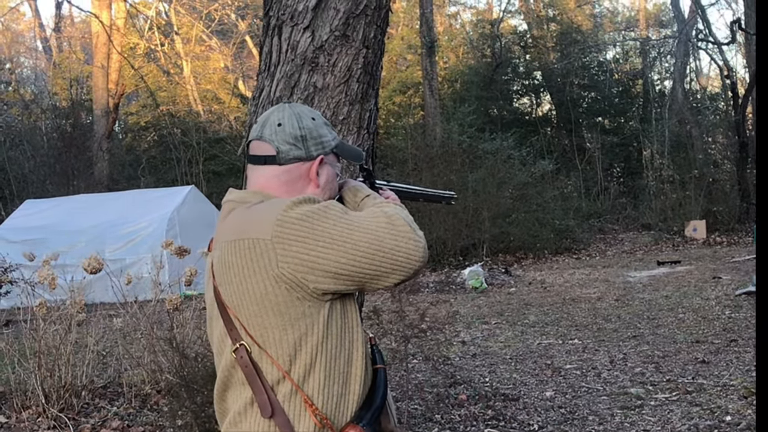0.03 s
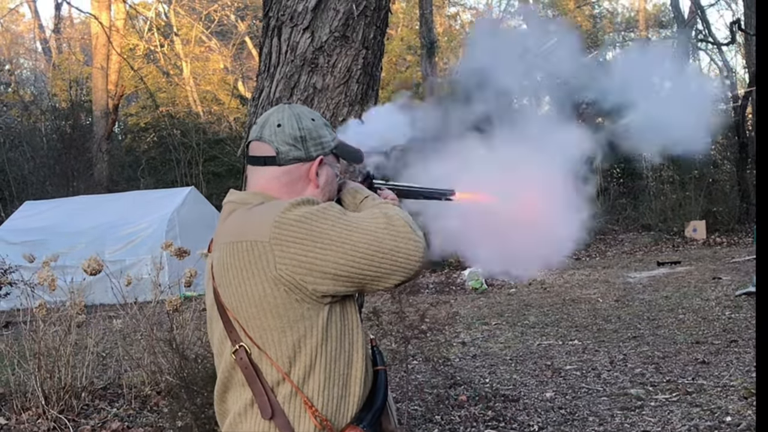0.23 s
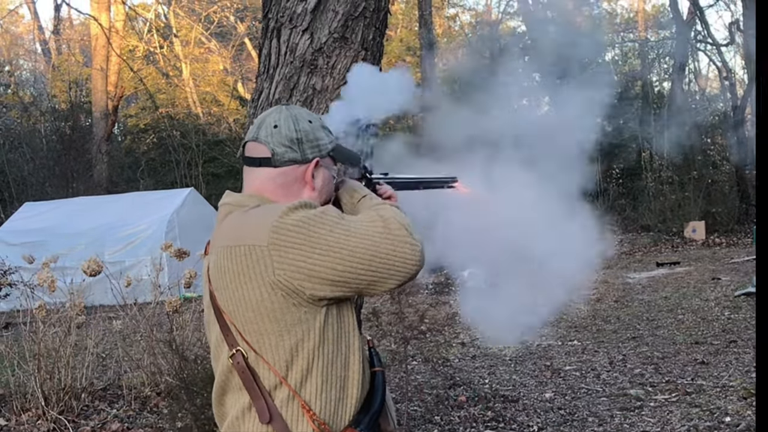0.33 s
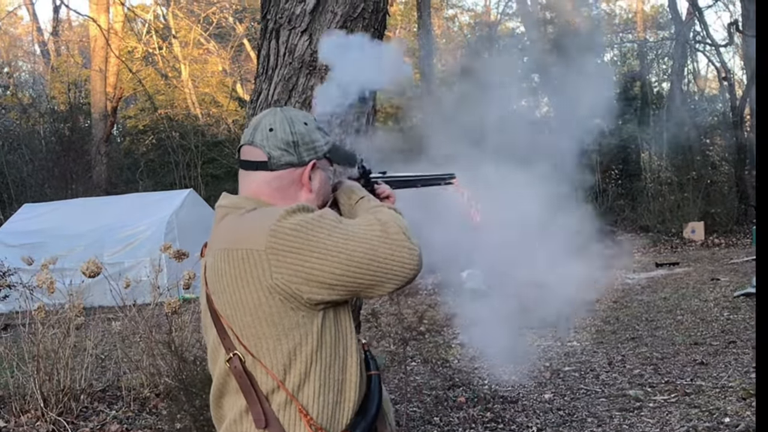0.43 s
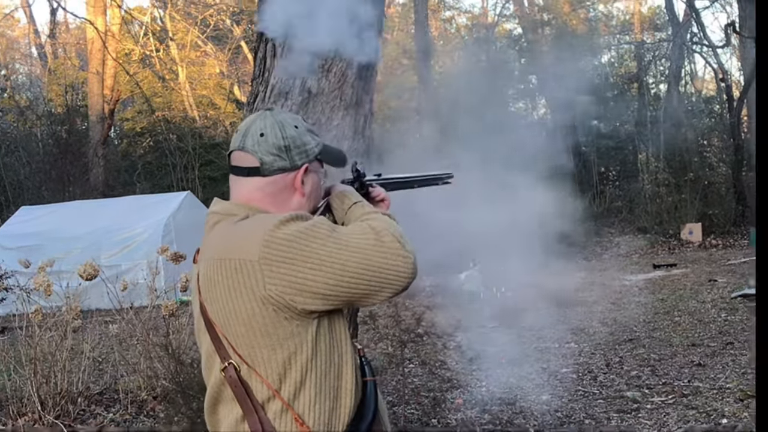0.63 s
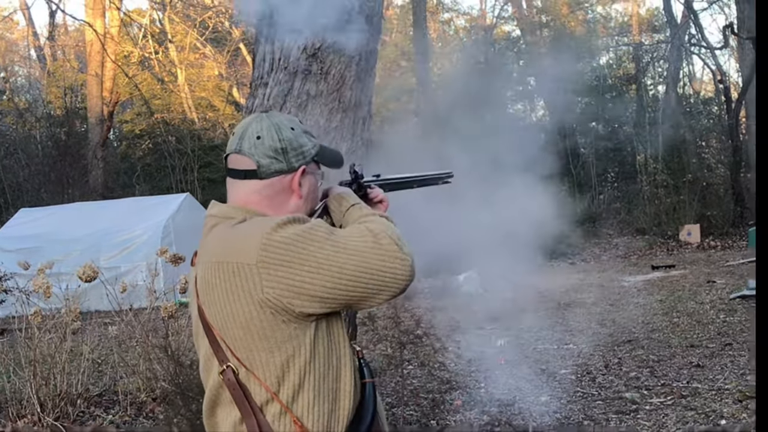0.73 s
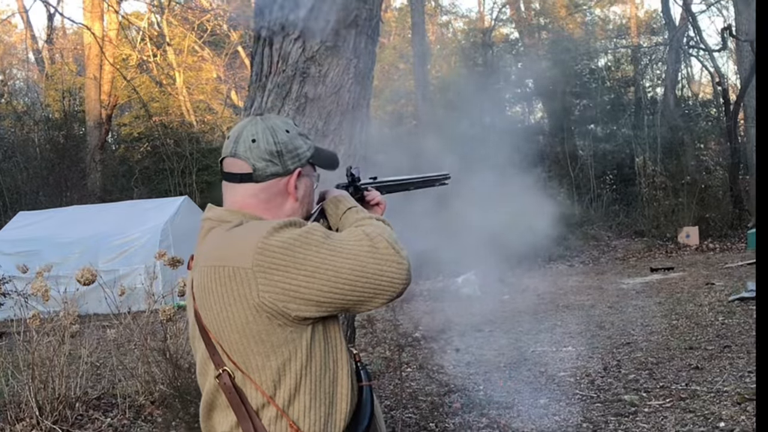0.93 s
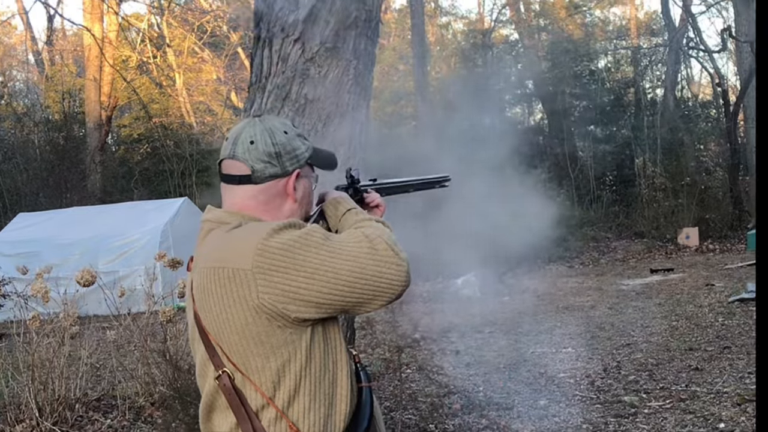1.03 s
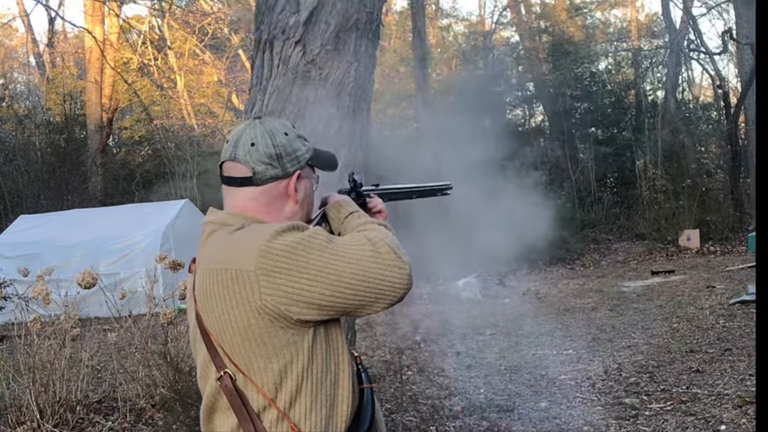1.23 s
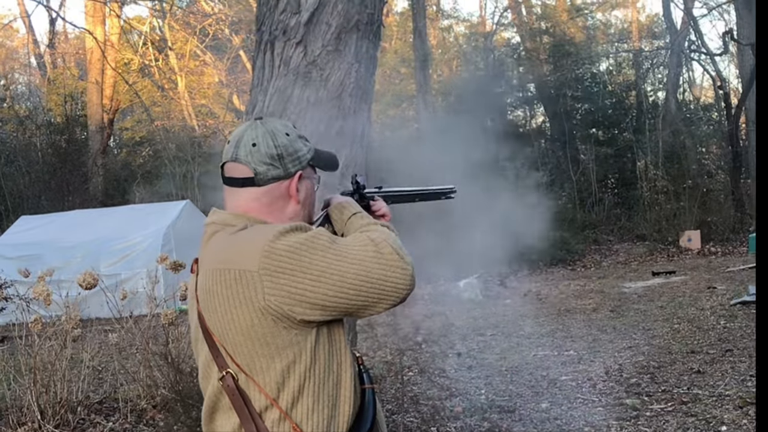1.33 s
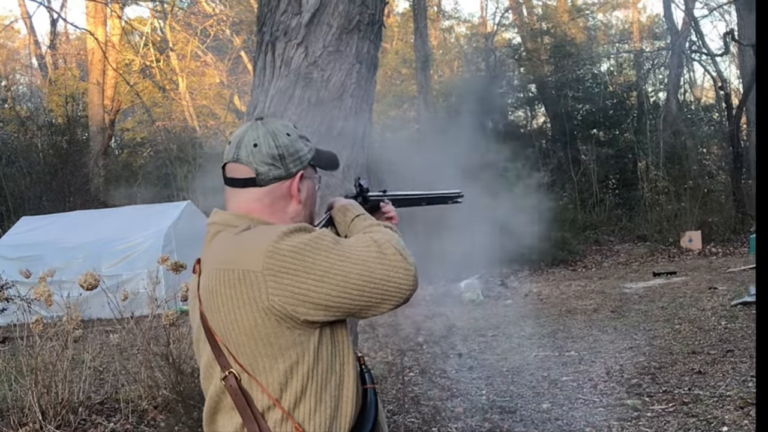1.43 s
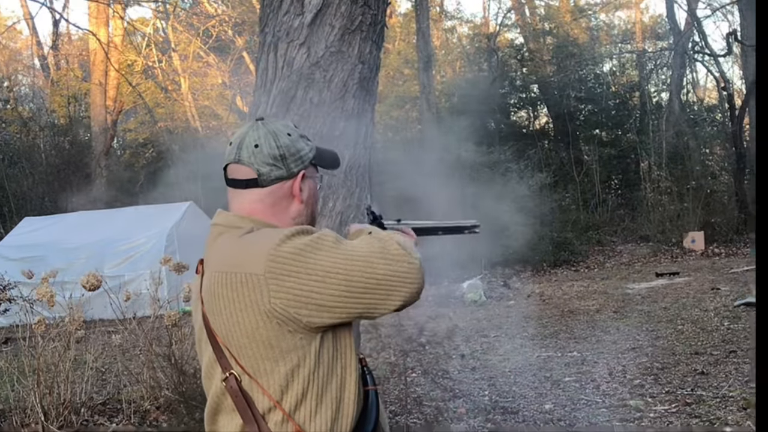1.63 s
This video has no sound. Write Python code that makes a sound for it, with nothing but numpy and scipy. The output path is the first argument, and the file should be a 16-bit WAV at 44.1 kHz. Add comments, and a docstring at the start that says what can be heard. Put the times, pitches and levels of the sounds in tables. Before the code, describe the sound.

A flintlock rifle fires one shot a few metres away in a clearing. The flint snaps at 0.1 seconds, powder fizzes briefly, and at 0.2 seconds comes a loud crack with a deep, thumping roar. Nearby trunks slap it back until 0.4 seconds, then a dulling echo rolls through the woods, fading by about 1.7 seconds. A faint low rumble lies underneath, with tiny ticks of gear around 1.5 seconds.

```python
"""First comes the snap of flint on steel and a fizz of powder, then a flintlock rifle fires in a clearing,
a few metres away. The charge goes off with a crack, a roar of gas and deep pressure waves.
Near trunks slap the sound back, then the woods roll it away, ever duller as the air soaks up the treble.
Underneath lie a low rumble and faint ticks of gear and leaf litter."""
import sys
import numpy as np
from scipy import signal
from scipy.fft import rfft, irfft
from scipy.io import wavfile

SR = 44100
rng = np.random.default_rng(int(sys.argv[2]) if len(sys.argv) > 2 else 0)


def unload_wav(signal):
    """Save mono or channel-first audio to the path in sys.argv[1] as 16-bit WAV at rate SR, clipped to [-1, 1]."""
    wavfile.write(
        sys.argv[1],
        SR,
        np.round(np.clip(np.atleast_2d(signal).T, -1, 1) * 32767).astype(np.int16),
    )


N = 74970
T = np.arange(N) / SR
HZ = np.maximum(np.arange(N + 1) * SR / (2 * N), 1)
SHOT_S, ROAR_S = .2068, .214  # when the crack and the roar start

# The tone colour of each noise. Each row: frequency in Hz, relative level in dB.
CRACK_COLOUR = [(40, -19.5), (120, -3.5), (300, 1.5), (800, -2.5), (2200, -9.5), (3200, -8), (8000, -6.5),
                (11000, -11), (15500, -11)]
ROAR_COLOUR = [(25, -19), (55, -5.5), (110, -5), (200, 4.5), (330, -1.5), (500, -10), (1100, -4.5),
               (1700, -4.5), (3000, -8.5), (5000, -15), (8500, -15), (11000, -19.5), (15500, -20)]
CLICK_COLOUR = [(150, -27), (400, -17.5), (620, -7), (1300, 4.5), (3400, 1), (4700, -5), (6200, 7.5),
                (7600, -6.5), (9000, 6.5), (10700, -12.5), (12700, -0.5), (15500, -4.5)]
RATTLE_COLOUR = [(150, -13.5), (500, -3), (1100, -2), (2200, 4.5), (4300, -6.5), (9000, -4), (10700, -6),
                 (12700, 1), (15500, -2.5)]
SPIT_COLOUR = [(60, 2), (220, 6), (600, 2), (3000, 0), (7000, -3), (15000, -4)]
SLAP_COLOUR = [(100, -16.5), (500, -10), (1300, 6.5), (3300, -7), (5000, -4.5), (6800, 2), (8500, -8),
               (15000, -5.5)]
NEAR_COLOUR = [(30, -23.5), (70, -5.5), (130, -2), (220, -8.5), (330, -2), (460, -8), (700, -5), (1200, 2),
               (1800, -1.5), (3000, -8.5), (6000, -11.5), (10000, -16), (15500, -15)]
FAR_COLOUR = [(40, -24), (90, -5.5), (170, -5.5), (380, -11.5), (700, -3.5), (1100, 0.5), (1600, -1),
              (2200, -8.5), (3200, -13), (5000, -21.5), (9000, -21.5)]
RUMBLE_COLOUR = [(20, -28.5), (50, -7.5), (88, -1.5), (125, -6.5), (220, -11), (380, -30), (600, -24.5),
                 (1000, -35), (2500, -42.5), (6000, -52), (15000, -62)]
RUSTLE_COLOUR = [(1000, -28), (5000, 0), (15000, -10)]
# Pressure waves and their reflections. Each row: peak time in seconds, pitch then in Hz, level in dB,
# spread around the peak in seconds.
THUMPS = [(.2230, 295, -9, .0045), (.2412, 120, -7.5, .0052), (.2500, 65, -18, .012),
          (.2645, 240, -12, .0035), (.2703, 130, -8.5, .005), (.2840, 65, -20.5, .010),
          (.3290, 135, -8, .0036)]
# Blows in the lock (the firing mechanism): its catch, flint on steel, rebounds. Each row: start in
# seconds, level in dB, seconds to fade by 60 dB, frequency in Hz where it rings most.
LOCK_BLOWS = [(.0950, -33, .11, 2000), (0.1008, -15.5, 0.023, 4000), (0.102, -24.5, 0.053, 3000),
              (0.1056, -26, 0.027, 2800), (0.1095, -25.5, 0.037, 850), (0.1135, -24, 0.011, 1400),
              (0.133, -30.5, 0.0093, 2200), (.146, -35, .04, 12000)]
# Tones of the stock, lock and barrel. Each row: pitch in Hz, relative level in dB, an unused value.
RIFLE_TONES = [(790, -2, .025), (1428, -1, .045), (1740, -15, .06), (2150, -6, .055), (2790, -18, .08),
               (3000, -6, .04), (3410, -13, .08), (3960, -16, .1), (5836, -13, .05), (9080, -13, .08),
               (12280, -13, .13), (12860, -13, .13), (14580, -6, .12)]
# Spits of powder. Each row: start in seconds, level in dB, seconds to fade by 60 dB.
SPITS = [(0.1867, -24, .025), (0.1939, -31.5, .05), (0.197, -27.5, 0.075), (0.1978, -30.5, .05)]
# Echoes from near trunks. Each row: start in seconds, level in dB, seconds to fade by 60 dB,
# frequency in Hz above which it is dulled.
SLAPS = [(.2175, -26, 0.0029, 3000), (0.2196, -9, 0.0081, 2568), (.2285, -32, 0.03, 12000),
         (0.256, -16.5, 0.064, 6034), (.2990, -19.5, 0.054, 7000), (0.3175, -14, 0.063, 4630),
         (0.335, -18, 0.0077, 1500), (0.3524, -24, 0.11, 7000), (0.3562, -2.5, 0.0034, 11900),
         (0.3575, -22, 0.056, 7250), (0.3633, -12.5, 0.011, 5500), (0.3768, -17.5, 0.018, 3500)]
# Echo from the clearing's edge and the deep woods. Each row: time in seconds, level in dB before dulling.
NEAR_WOODS = [(.25, -26.5), (.38, -26), (.435, -29.5), (.47, -23.5), (.505, -28.5), (.545, -24), (.61, -29),
              (.68, -34), (.85, -39.5), (1.1, -50.5)]
FAR_WOODS = [(.5, -55), (.72, -36), (.85, -37), (1.0, -34), (1.18, -32.5), (1.3, -34.5), (1.45, -37),
             (1.7, -38)]
# The rumble dips after the shot and comes back. Each row: time in seconds, level change in dB.
RUMBLE_DIP = [(.18, 9), (.3, 2), (0.949, -6), (1.299, 1.5)]
# Ticks of gear and leaf litter. Each row: start in seconds, level in dB, centre frequency in Hz.
TICKS = [(1.225, -59, 7010), (1.3480, -59, 10950), (1.3863, -58, 13500), (1.4464, -57, 8560),
         (1.4890, -59, 11970), (1.508, -58, 13020), (1.5604, -44, 6960), (1.5680, -55.5, 13040),
         (1.5705, -48.5, 7000), (1.5768, -62, 11000), (1.639, -58, 9960)]


def muzzle_blast():
    """The charge makes a bright crack, then a ragged roar of escaping gas that dulls as it dies."""
    crack = noise(CRACK_COLOUR) * envelope(SHOT_S, fade_s=.027, rise_s=.003, hold_s=.0115)
    gas = noise(ROAR_COLOUR, grains(per_s=9000, spread_db=3))
    flutter = undb(2.03 * wander(width_hz=55))
    roar = dulled(unit(gas * flutter), ROAR_S, db_per_s=10)
    roar *= envelope(ROAR_S, fade_s=.38, rise_s=.00096, hold_s=.042)
    return undb(-7.5) * crack + undb(-12) * roar


def thumps():
    """Each pressure wave is a short swing around a deep suction, sinking in pitch as it passes."""
    fall_per_s = 32
    waves = 0
    for peak_s, hz, db, spread_s in THUMPS:
        age = T - peak_s
        cycles = hz * (1 - np.exp(-fall_per_s * age)) / fall_per_s
        swell = np.exp(-.5 * (age / spread_s) ** 2)
        waves -= undb(db) * swell * np.cos(2 * np.pi * cycles)
    return waves


def lock():
    """Each blow clicks and rings its own part of the rifle; the parts rattle on briefly."""
    blows = [((undb(db) * envelope(start, fade_s)) ** 2, hz) for start, db, fade_s, hz in LOCK_BLOWS]
    reach_octaves = .45
    ring = 0
    for hz, db, _ in RIFLE_TONES:
        # A blow rings the tones nearest its own frequency most.
        shares = [power / (1 + (np.log2(hz / centre) / reach_octaves) ** 2) for power, centre in blows]
        tone = np.sin(2 * np.pi * (hz * T + rng.random()))
        ring += undb(db - 3) * np.sqrt(sum(shares)) * tone
    clicks = np.sqrt(sum(power for power, _ in blows)) * noise(CLICK_COLOUR)
    rattle = noise(RATTLE_COLOUR, grains(per_s=4700, spread_db=5.5)) * envelope(.101, fade_s=.69)
    return clicks + undb(-34) * rattle + ring


def priming():
    """The pinch of powder that lights the charge catches in a few spits."""
    return noise(SPIT_COLOUR) * sum(undb(db) * envelope(start, fade_s) for start, db, fade_s in SPITS)


def slaps():
    """The nearest trunks throw back short, separate echoes."""
    return sum(undb(db) * envelope(start, fade_s) * noise(SLAP_COLOUR, edge_hz=hz)
               for start, db, fade_s, hz in SLAPS)


def woods(levels, colour):
    """Thousands of trunks scatter the shot; the later the echo, the more treble the air has taken."""
    echoes = noise(colour, grains(per_s=9000, spread_db=2))
    return dulled(echoes, SHOT_S, db_per_s=8) * level_curve(levels) * (T > ROAR_S)


def rumble():
    """Still outdoor air carries a distant rumble and a wavering hum."""
    hum = undb(-58.5) * wander(width_hz=9, centre_hz=83)
    air = undb(-55.5) * noise(RUMBLE_COLOUR)
    return (air + hum) * level_curve(RUMBLE_DIP)


def ticks():
    """Gear and leaf litter give tiny, dry bursts of high noise."""
    sound = 0
    for start, db, hz in TICKS:
        low, high = hz / 2 ** .5, hz * 2 ** .5  # half an octave each way
        colour = [(low / 2, -18), (low, -9), (hz, 0), (high, -9)]
        sound += undb(db) * envelope(start, fade_s=.012) * noise(colour)
    return sound


def rustle():
    """A fine rustle creeps in under the late echo."""
    fade_in = np.clip((T - .95) / .28, 0, 1)
    return undb(-74) * noise(RUSTLE_COLOUR, grains(per_s=1500, spread_db=1.5)) * fade_in


def undb(db):
    """Turn decibels into a factor to multiply by."""
    return 10 ** (np.asarray(db) / 20)


def unit(x):
    """Scale to an average strength (rms) of 1."""
    return x / np.sqrt(np.mean(x ** 2))


def level_curve(points):
    """Loudness that glides between points of time and level."""
    times, db = np.array(points).T
    return undb(np.interp(T, times, db))


def envelope(start, fade_s, rise_s=.000078, hold_s=0):
    """Rise, hold, then fall by 60 dB every fade_s seconds."""
    age = T - start
    return np.clip(age / rise_s, 0, 1) * np.exp(-np.log(1000) * np.maximum(age - hold_s, 0) / fade_s)


def noise(colour, source=None, edge_hz=None):
    """Noise of strength 1 in the given colour, dulled above edge_hz if given."""
    hz, db = np.array(colour, float).T
    gain = undb(np.interp(np.log(HZ), np.log(hz), db))
    gain *= HZ ** 2 / (HZ ** 2 + 20 ** 2)  # weakens the bass below 20 Hz
    if edge_hz is not None:
        gain /= np.hypot(1, (HZ / edge_hz) ** 2)
    source = rng.standard_normal(N) if source is None else source
    return unit(irfft(rfft(source, 2 * N) * gain)[:N])


def grains(per_s, spread_db):
    """Tiny clicks of uneven size at random times."""
    clicks = (rng.random(N) < per_s / SR) * rng.choice([-1, 1], N)
    return clicks * undb(spread_db * rng.standard_normal(N))


def wander(width_hz, centre_hz=0):
    """A random wobble of strength 1, made of frequencies near centre_hz."""
    band = np.exp(-.5 * ((HZ - centre_hz) / width_hz) ** 2)
    return unit(irfft(rfft(rng.standard_normal(2 * N)) * band)[:N])


def dulled(x, start, db_per_s):
    """Higher bands fade faster; db_per_s is the loss at 1000 Hz."""
    centres = np.geomspace(100, 16000, 16)
    spectrum, age = rfft(x, 2 * N), np.maximum(T - start, 0)
    sound = 0
    for hz, share in zip(centres, np.eye(len(centres))):
        band = irfft(spectrum * np.interp(np.log(HZ), np.log(centres), share))[:N]
        loss_db = db_per_s * (hz / 1000) ** .79 * age
        sound += band * undb(-loss_db)
    return sound


def scene():
    """The rifle, its echoes and the background, alike in both channels."""
    echoes = slaps() + woods(NEAR_WOODS, NEAR_COLOUR) + woods(FAR_WOODS, FAR_COLOUR)
    rifle = lock() + priming() + muzzle_blast() + thumps()
    background = rumble() + ticks() + rustle()
    microphone_hiss = undb(-80.5) * rng.standard_normal(N)
    mono = rifle + echoes + background + microphone_hiss
    return np.array([mono, mono])


def record(dry):
    """Round off the tallest peaks and cut the highest treble."""
    ceiling, top_hz = .88, 15650
    rounded = dry / (1 + (dry / ceiling) ** 4) ** .25
    return signal.sosfilt(signal.ellip(10, .2, 80, top_hz, fs=SR, output="sos"), rounded)


dry = scene()
out = record(dry)
unload_wav(out)
```